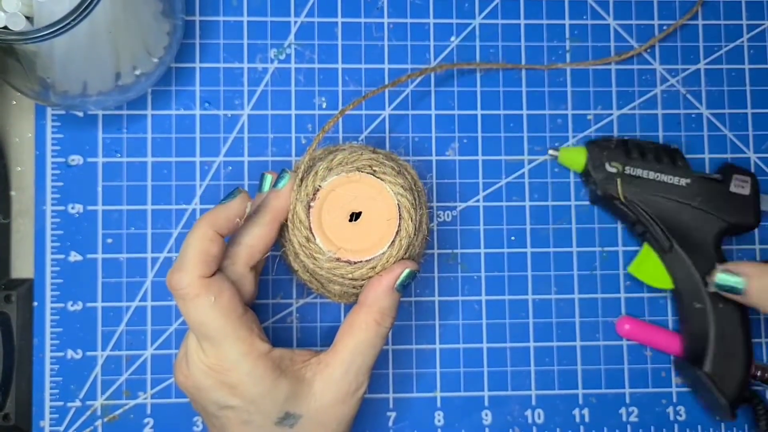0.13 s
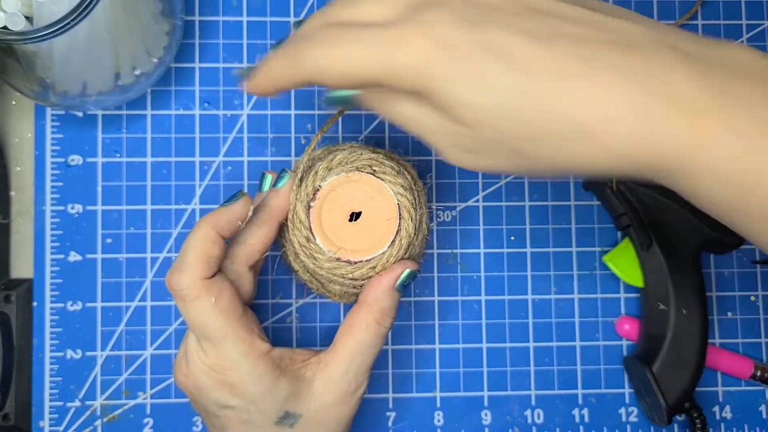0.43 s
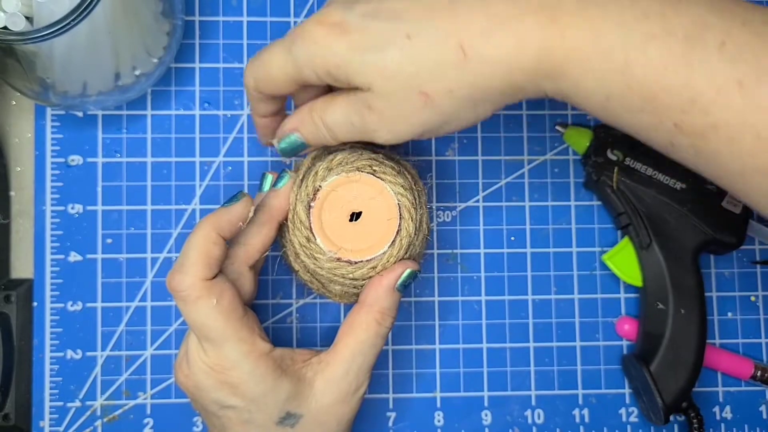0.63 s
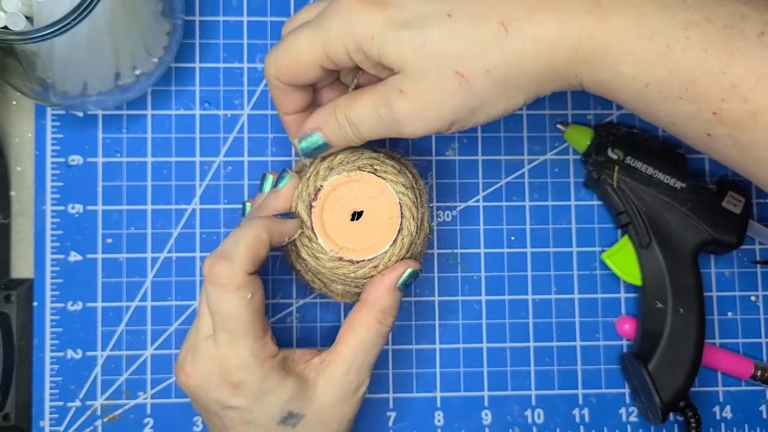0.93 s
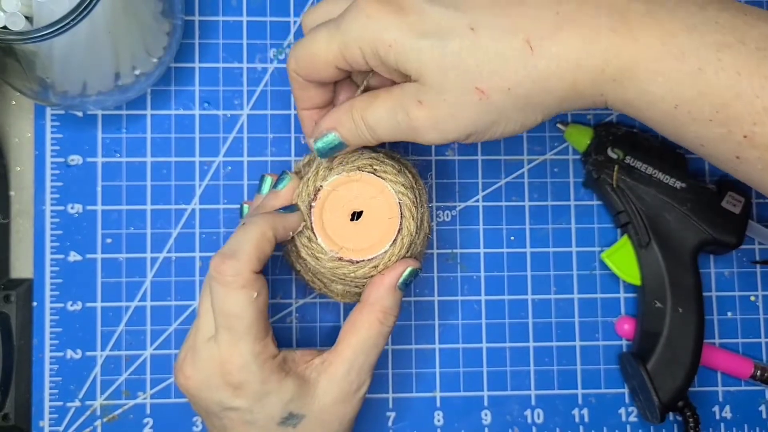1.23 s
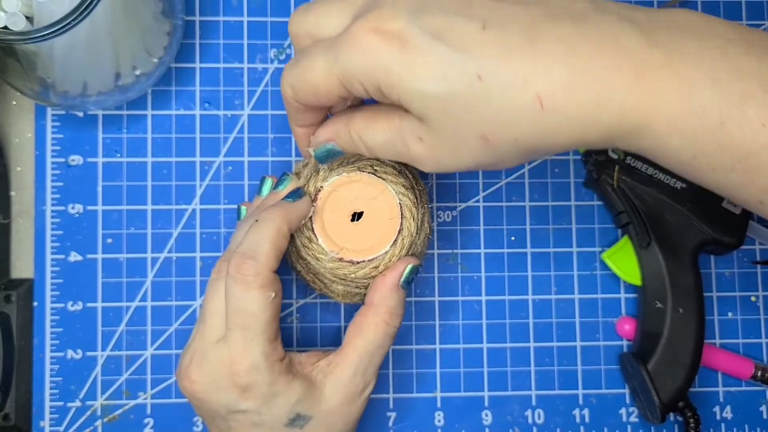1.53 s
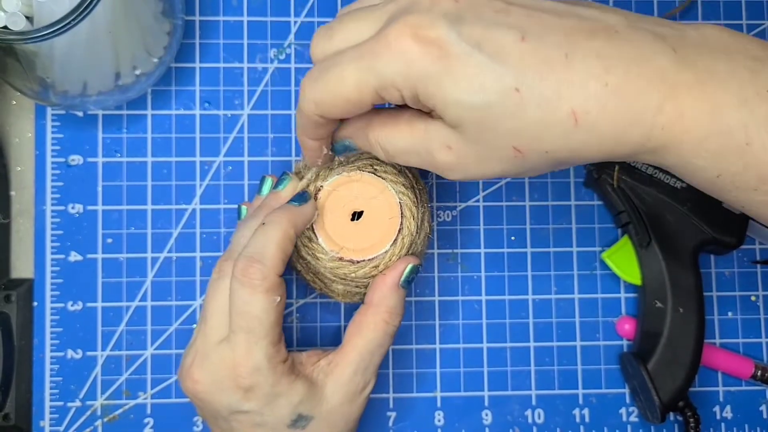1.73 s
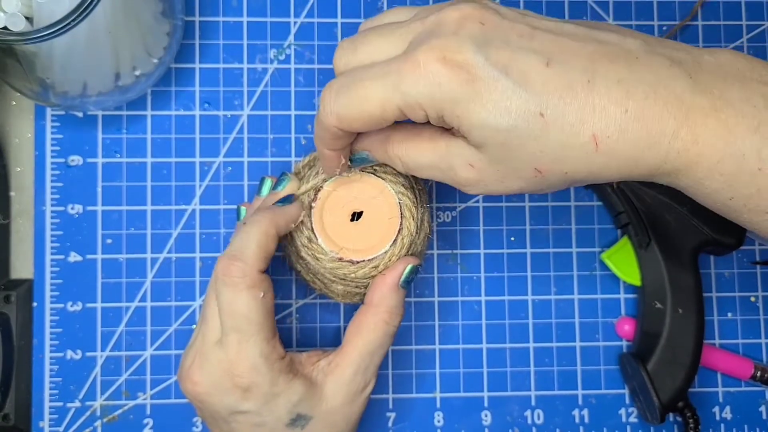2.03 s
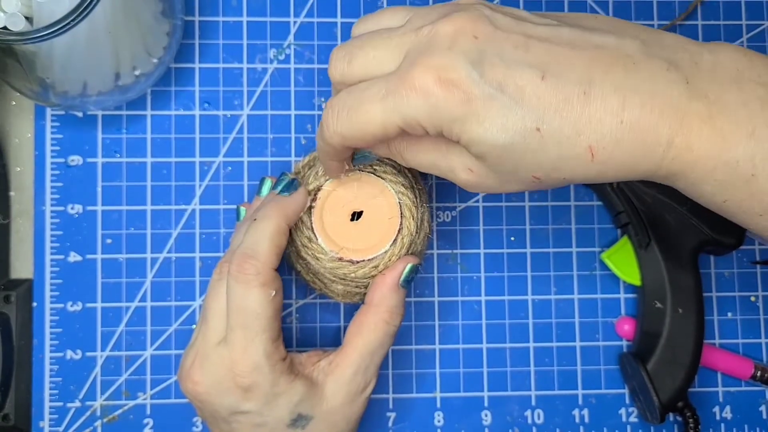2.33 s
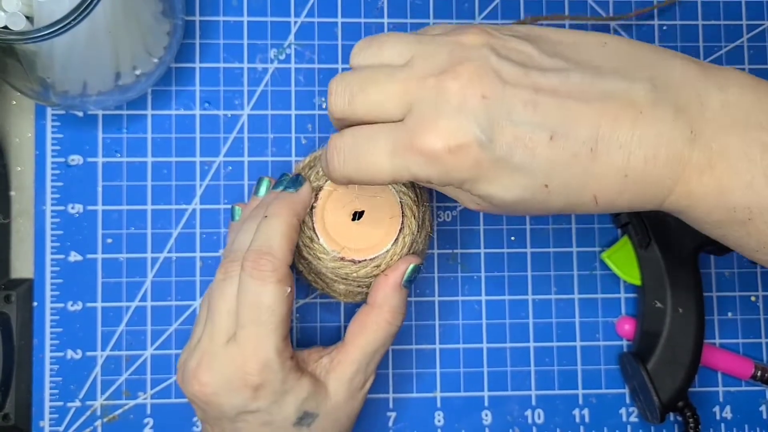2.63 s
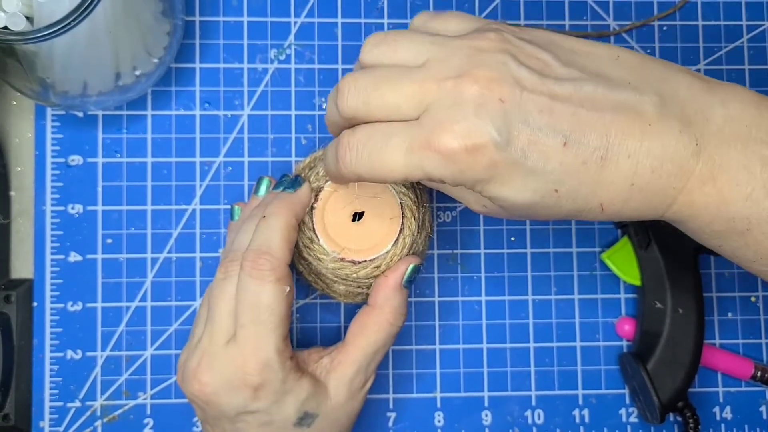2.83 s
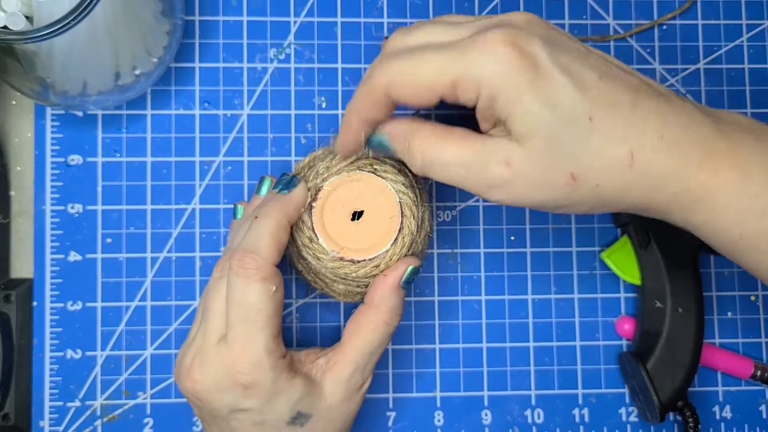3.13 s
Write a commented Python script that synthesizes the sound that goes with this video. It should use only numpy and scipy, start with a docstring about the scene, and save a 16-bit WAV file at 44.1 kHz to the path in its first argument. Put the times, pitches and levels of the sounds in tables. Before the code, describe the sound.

Plastic tool clatters onto a desk mat, then only faint fan hum and tiny twine rustles.

```python
"""A plastic glue gun scuffs over a cutting mat and is set down on a desk: a dull knock, then a sharp clack
as it tips onto its side, a short rattle and a brief ring of the small room. Fingers then press twine onto
a ball with faint rustles and ticks. Mains hum, a fan's air and tones, and a thin whine run throughout.
The blows and rattle are dying modes (plus a noise crack in each blow), scuff and twine are grainy noise,
the air is filtered noise, and the hum, fan tones and whine are sine waves whose levels vary."""
import sys
import numpy as np
from scipy import signal
from scipy.fft import rfft, irfft
from scipy.io import wavfile

SR = 44100
rng = np.random.default_rng(int(sys.argv[2]) if len(sys.argv) > 2 else 0)


def master_out(mix):
    """Clip the mix to full scale and print it as 16-bit PCM to the path in sys.argv[1]."""
    frames = np.transpose(np.atleast_2d(mix))
    ceiling = np.clip(frames, -1, 1)
    pcm = np.round(ceiling * 32767).astype(np.int16)
    wavfile.write(sys.argv[1], SR, pcm)


N = 145530  # length in samples

# ringing modes of the plastic shell, before ring() reweights them: f/Hz, level/dB, time to fall 60 dB/s
SHELL_MODES = [(1060, -27.5, 0.02), (1380, -35, 0.025), (1895, -25.5, 0.018), (2397, -25, 0.036),
               (2736, -24.5, 0.016), (2920, -23, 0.027), (3500, -25.5, 0.016), (6600, -25.5, 0.008),
               (8574, -27, 0.018), (13400, -32.5, .018), (15200, -26, 0.016)]
WAVER = 0.73  # depth of the random wavering in the fan tones and the whine


def amp(db):
    """Turns decibels into a gain."""
    return 10 ** (np.asarray(db) / 20)


def unit(x):
    """Scales a sound to an average strength (rms) of 1."""
    return x / np.sqrt(np.mean(x ** 2) + 1e-20)


def read(points, hz):
    """Reads between the points of a table, on a log-frequency axis."""
    f, value = np.transpose(points)
    return np.interp(np.log(hz + 1), np.log(f + 1), value)


def bins(x):
    """Lists the frequencies in a sound's spectrum."""
    return np.fft.rfftfreq(x.shape[-1], 1 / SR)


def colour(x, points):
    """Makes each frequency louder or softer by a table in dB."""
    return irfft(rfft(x) * amp(read(points, bins(x))), x.shape[-1])


def pan(db):
    """Gives left and right gains for a level difference; positive is louder on the left."""
    return amp(np.array([[.5], [-.5]]) * db)


def place(x, points):
    """Sets the left-right balance separately at each frequency."""
    return irfft(rfft(x) * pan(read(points, bins(x))), x.shape[-1])


def add(mix, s, sound):
    """Mixes a sound in, starting at a time in seconds."""
    part = mix[:, max(round(s * SR), 0):][:, :sound.shape[-1]]
    part += sound[..., :part.shape[-1]]


def diffuse(pair):
    """Makes two unrelated signals alike in the bass, as at two close microphones."""
    # likeness of the two microphones: f/Hz, coherence (1 = same, 0 = unrelated, negative = opposed)
    likeness = [(60, 0.92), (300, 1), (640, 0.34), (1400, -0.18), (3000, 0.0048)]
    a, b = rfft(pair)
    same = np.clip(read(likeness, bins(pair)), -1, 1)
    right = same * a + np.sqrt(1 - same ** 2) * b
    return irfft(np.array([a, right]), pair.shape[-1])


def drift(rate_hz):
    """Wanders randomly with rms 1; movements faster than the rate are weakened."""
    x = rng.standard_normal(N)
    return unit(irfft(rfft(x) / (1 + (bins(x) / rate_hz) ** 4), N))


def grainy(grain_db):
    """Makes stereo noise from many small slips of uneven size."""
    boost_db = grain_db * np.minimum(rng.exponential(1, N), 5)
    return unit(rng.standard_normal((2, N)) * amp(boost_db))


def soften(x, bright_hz, order):
    """Dulls a contact: a soft one passes little above its brightness."""
    return signal.lfilter(*signal.butter(order, min(bright_hz, SR / 2 - 1), fs=SR), x)


def ring(modes, t, flip):
    """Sums dying modes, each weighted by flip once more; a negative flip makes neighbours swing oppositely."""
    total = 0
    for k, (hz, db, t60) in enumerate(modes):
        total = total + flip ** k * amp(db - 60 * t / t60) * np.cos(2 * np.pi * hz * t)
    return total


def hum():
    """Mains hum: one low sine whose level rises and falls."""
    hum_level = [(0.4, -48), (1.3, -45.5), (1.69, -51), (2.1, -46.5), (2.72, -49), (3.06, -46), (3.25, -48)]  # level of the hum over time: t/s, level/dB
    t = np.arange(N) / SR
    return amp(np.interp(t, *np.transpose(hum_level))) * unit(np.sin(2 * np.pi * 58.8 * t))


def fan_air():
    """Rushing air of the fan: steady noise, strongest in the bass."""
    air_tone = [(20, -19), (45, 5), (70, 2.5), (100, -1.5), (165, -8.5), (270, -4), (335, -0.5),
                (600, -3.5), (830, -10.5), (1300, -10), (2200, -17.5), (3000, -17.5), (5300, -30.5),
                (6400, -30), (7200, -41), (8700, -35.5), (11000, -42.5), (15500, -42)]  # tone of the air: f/Hz, relative level/dB
    air_balance = [(100, 7), (400, -2), (700, -1.5), (1300, 1), (3000, 2), (4800, 1.5), (6400, 6.5),
                   (7600, -2), (15000, -1.5)]  # where the air is heard: f/Hz, left-right level/dB
    air = colour(diffuse(rng.standard_normal((2, N))), air_tone)
    return amp(-53.5) * unit(place(air, air_balance))


def fan_tones():
    """Tones of the fan: sines whose strength and phase waver randomly."""
    tones = [(244, -73.5, -16), (326, -67.5, 6), (649, -71, -11.5), (1130, -83, -22.5)]  # tones of the fan: f/Hz, level/dB, left-right level/dB
    t = np.arange(N) / SR
    out = 0
    for hz, db, pan_db in tones:
        turn = 2 * np.pi * (hz * t + rng.random())
        in_step = (1 + WAVER * drift(2.3)) * np.sin(turn)
        out_of_step = WAVER * drift(10.4) * np.cos(turn)
        out = out + amp(db) * pan(pan_db) * unit(in_step + out_of_step)
    return out


def background():
    """Hum, fan air and fan tones sounding together."""
    return hum() + fan_air() + fan_tones()


def whine():
    """A thin whine: a sine with fast random flutter that swells and recedes."""
    whine_level = [(0, -87), (.7, -79), (1.04, -73.5), (1.2, -78), (1.6, -79.5), (2.0, -85.5), (3.3, -83.5)]  # level of the whine over time: t/s, level/dB
    whine_hz, pan_db = 2740, 3
    t = np.arange(N) / SR
    flutter = 1 + WAVER * (drift(24.94) + 1j * drift(25))
    tone = (flutter * np.exp(2j * np.pi * whine_hz * t)).real
    return pan(pan_db) * amp(np.interp(t, *np.transpose(whine_level))) * unit(tone)


def scuff():
    """The housing slides and settles on the mat: grainy noise that stops when the gun lies still."""
    scuff_level = [(0, -22.5), (.02, -29), (0.035, -36), (0.06, -32.5), (.085, -29.5), (0.104, -32.5),
                   (.135, -33), (.2, -41.5), (.228, -57), (.275, -48.5), (.32, -51.5), (0.371, -56)]  # strength of the sliding over time: t/s, level/dB
    scuff_tone = [(40, -30), (110, 0), (210, 11), (320, 5), (500, -0.5), (900, -13), (2000, -21.5),
                  (3000, -17), (4300, -37), (15000, -40.5)]  # tone of the sliding: f/Hz, relative level/dB
    s, db = np.transpose(scuff_level)
    level = amp(np.interp(np.arange(N) / SR, s, db, right=-np.inf))  # silent after the last point
    return level * unit(colour(diffuse(grainy(3)), scuff_tone))


def room(x):
    """Dense reflections of a small room, where the bass lingers longest."""
    fade_time = [(80, 0.703), (260, .33), (700, 0.28), (1840, 0.29), (4000, 0.13), (7000, 0.12),
                 (12800, 0.21)]  # how long the room rings: f/Hz, time to fall 60 dB/s
    room_tone = [(60, -11), (210, -17), (350, -8), (600, -17), (1000, 1), (1500, 5.5), (2100, -3.5),
                 (3000, -10.5), (6000, 0), (14000, -16)]  # strength of the reflections: f/Hz, level/dB
    delay_s, build_s = 0.0026, 0.0019
    taps = diffuse(rng.choice([-1., 1.], (2, SR)))
    hz, t, z = signal.stft(taps, SR, nperseg=256)
    t60 = read(fade_time, hz)[:, None]
    even_out = np.sqrt(2 * np.log(1000) / (t60 * SR))  # a longer ring gets no extra energy
    z = z * amp(read(room_tone, hz)[:, None] - 60 * t / t60) * even_out
    tail = signal.istft(z, SR, nperseg=256)[1]
    tail = tail * np.clip((np.arange(tail.shape[-1]) / SR - delay_s) / build_s, 0, 1)
    return signal.fftconvolve(x[:1], tail, axes=1)[:, :N]  # the left channel feeds both sides


def blow(thump_db, body_db, body_hz, crack_db, crack_hz):
    """One contact: the desk thumps, the body rings and the shell cracks, reaching the left microphone first."""
    # modes of the gun's body on the desk, before ring() reweights them: f/Hz, level/dB, time to fall 60 dB/s
    body_modes = [(238, -18.5, 0.071), (303, -20.5, 0.09), (376.7, -16, .05), (450, -17.5, 0.061),
                  (605, -6.5, 0.031), (682, -13.5, 0.049)]
    crack_tone = [(300, 0), (1100, 0), (2000, -3.5), (3000, 11.5), (3950, -12.5), (5400, -12.5), (7600, -7),
                  (11500, -13), (15500, -6)]  # tone of the shell's crack: f/Hz, relative level/dB
    thump_hz, thump_t60_s = 99.7, 0.072
    noise_db, noise_t60_s = -10, 0.013
    right_lag_s = .00021
    t = np.maximum(np.arange(SR // 3) / SR - np.array([[0], [right_lag_s]]), 0)
    thump = amp(thump_db - 60 * t / thump_t60_s) * np.sin(2 * np.pi * thump_hz * t)
    body = soften((t > 0) * ring(body_modes, t, 0.91), body_hz, order=5)
    noise = unit(colour(rng.standard_normal(t.shape), crack_tone))
    crack = noise * amp(noise_db - 60 * t / noise_t60_s)
    shell = soften((t > 0) * (crack + ring(SHELL_MODES, t, -1.006)), crack_hz, order=3)
    return amp(crack_db) * shell - amp(body_db) * body - thump


def rattle():
    """Trigger and stand chatter against the shell in small, uneven contacts that die away."""
    per_s, bright_hz = 420, 3200  # average contacts each second, brightness
    start_db, t60_s, spread_db = -20.5, .17, 7.5
    t = np.arange(SR // 3) / SR
    taps = (rng.random(len(t)) < per_s / SR) * rng.choice([-1., 1.], len(t))
    uneven_db = spread_db * rng.uniform(-1.04, 1, len(t))
    taps = taps * amp(start_db - 60 * t / t60_s + uneven_db)
    return soften(signal.fftconvolve(taps, ring(SHELL_MODES, t, -0.908)), bright_hz, order=2)


def glue_gun():
    """The scuff, blows and rattle, with the room's answer; the desk radiates little deep bass."""
    # blows of the gun: t/s, desk thump level/dB, body ring level/dB, body brightness f/Hz,
    # shell crack level/dB, crack brightness f/Hz
    blows = [(.0088, -47, -25.5, 380, -21, 2610), (0.0189, -37, -25, 420, -27.5, 14100),
             (0.044, -24, -11.5, 270, -36.5, 2500), (0.0699, -11, 0.5, 510, -6.5, 4000),
             (0.1109, -33, 3, 688, 0, 14500), (0.1243, -38.5, -8.5, 398.7, -18, 3000),
             (0.1318, -36, -23.5, 399, -21, 3600), (.151, -22.5, -10.5, 549.5, -17.5, 3890),
             (.161, -31, -14.5, 280, -33.5, 2500), (.18, -40, -30, 397, -24, 3900),
             (.248, -31, -29.5, 420, -55, 2000)]
    gun_balance = [(100, 0.5), (400, 1.5), (650, -1.5), (1300, 2.5), (3500, 1), (6400, 10.5), (8500, -11),
                   (11000, 3.5), (15000, -3.5)]  # where the gun is heard: f/Hz, left-right level/dB
    low_cut_hz, rattle_s = 78, .114
    out = scuff()
    for s, *strengths in blows:
        add(out, s, blow(*strengths))
    add(out, rattle_s, rattle())
    out = signal.sosfilt(signal.butter(2, low_cut_hz, "high", fs=SR, output="sos"), out)
    padded = np.pad(out, ((0, 0), (0, SR)))  # keeps the end from wrapping round to the start
    return place(padded, gun_balance)[:, :N] + room(out)


def twine():
    """Grainy rubs, crisp in the fibres and dull in the ball, and tiny ticks under the fingers."""
    # fingers rubbing twine: middle t/s, half length t/s, fibre level/dB, ball level/dB
    rubs = [(0.295, 0.04, -78, -79), (0.651, 0.031, -69.5, -78), (1.46, 0.11, -74, -73),
            (1.643, 0.014, -65, -78), (1.76, 0.026, -77, -66), (2.445, 0.019, -78.5, -62),
            (2.629, 0.031, -65, -68.5), (3.07, 0.036, -74.5, -64.5)]
    ticks = [(.68, -61), (.926, -63.5), (1.372, -66), (2.047, -57), (2.437, -65.5), (3.003, -66)]  # fibres and nails ticking: t/s, level/dB
    fibre_tone = [(500, 6.5), (3000, 6.5), (6000, -2), (7200, -7.5), (9000, -3.5), (11500, -12),
                  (15500, -14)]  # crisp tone of the fibres: f/Hz, relative level/dB
    ball_tone = [(200, -12), (800, 4), (1500, 12), (3000, -8), (6000, -30)]  # dull rub of the wound ball: f/Hz, relative level/dB
    tick_t60_s = .025
    t = np.arange(N) / SR
    crisp, dull = 0, 0
    for s, db in ticks:
        crisp = crisp + (t >= s) * amp(db - 60 * abs(t - s) / tick_t60_s)
    for s, half, fibre_db, ball_db in rubs:
        stroke = np.exp(-.5 * ((t - s) / half) ** 2)  # swells and fades smoothly
        crisp = crisp + amp(fibre_db) * stroke
        dull = dull + amp(ball_db) * stroke
    grains = grainy(4)
    return crisp * unit(colour(grains, fibre_tone)) + dull * unit(colour(grains, ball_tone))


def scene():
    """Adds the glue gun, the twine, the background and the whine."""
    return glue_gun() + twine() + background() + whine()


def record(dry):
    """The recorder's band limit: a filter removes the treble above its edge."""
    edge_hz = 15750
    low_pass = signal.firwin(511, edge_hz, window=("kaiser", 8), fs=SR)
    return signal.oaconvolve(dry, low_pass[None], "same")


dry = scene()
out = record(dry)
master_out(out)
```